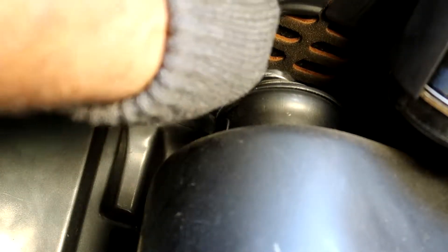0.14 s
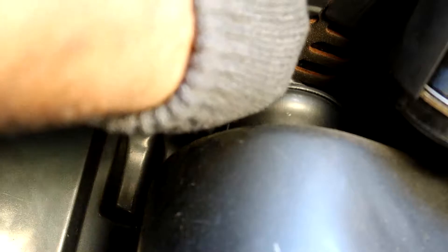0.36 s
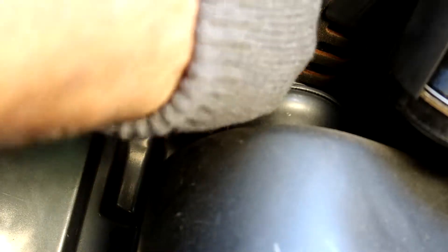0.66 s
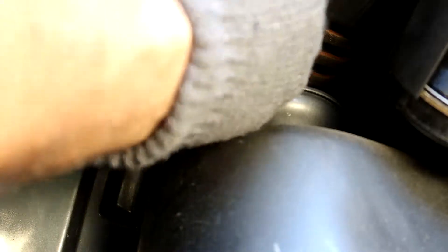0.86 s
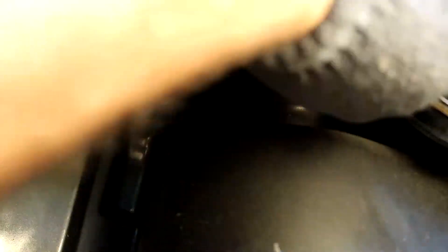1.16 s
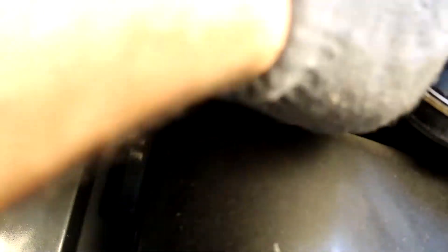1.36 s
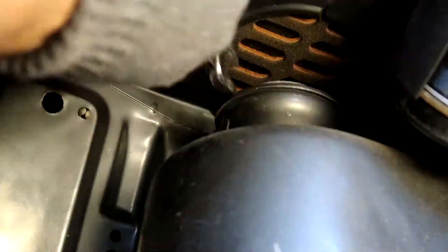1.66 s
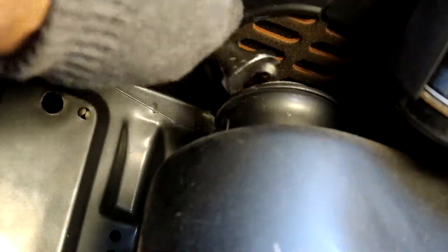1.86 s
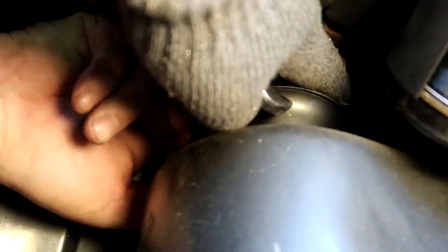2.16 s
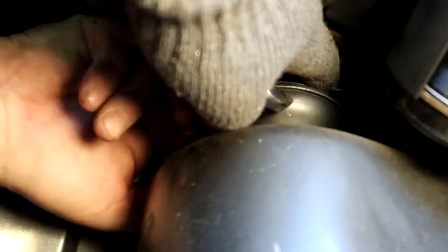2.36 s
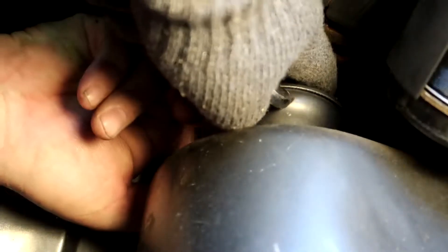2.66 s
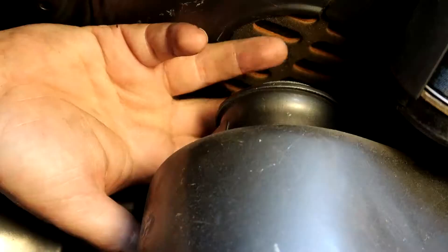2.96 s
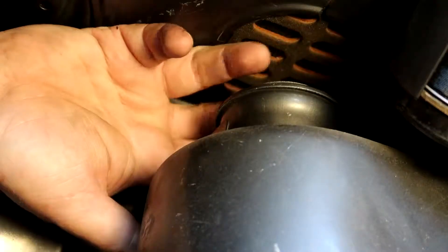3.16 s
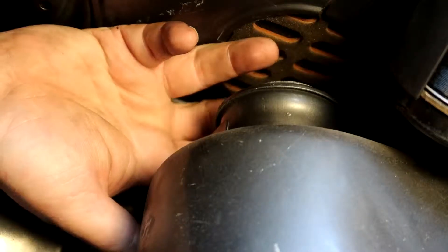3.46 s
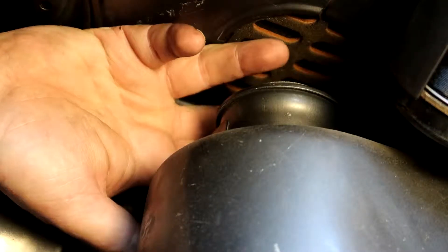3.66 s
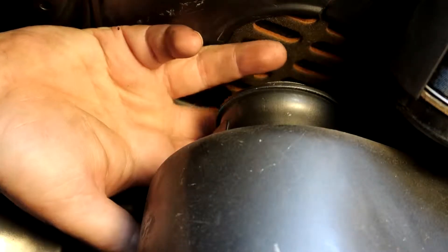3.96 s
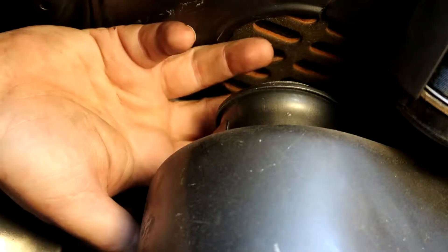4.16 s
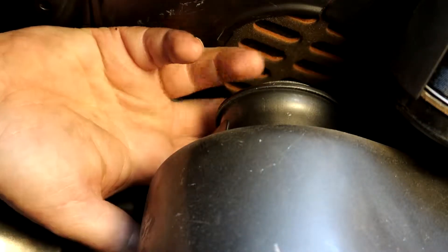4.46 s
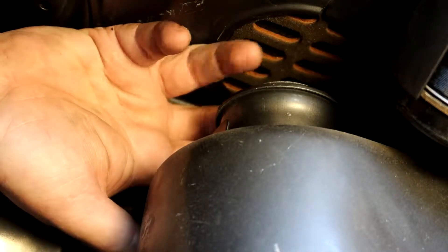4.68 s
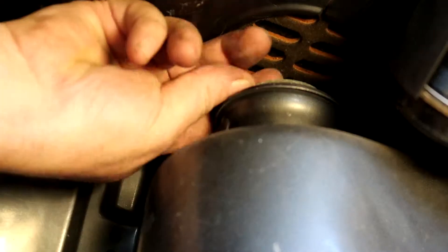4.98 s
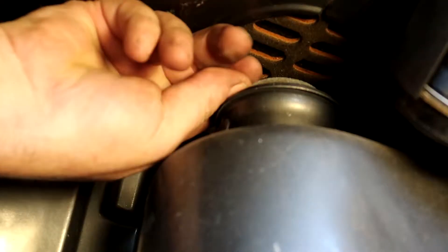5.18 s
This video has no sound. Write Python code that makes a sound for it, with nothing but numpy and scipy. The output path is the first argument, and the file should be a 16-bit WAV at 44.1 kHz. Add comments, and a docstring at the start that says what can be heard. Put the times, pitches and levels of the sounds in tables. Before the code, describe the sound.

A wrench slips and knocks sharply on a steel nut beside a hollow metal housing, then a finger spins the nut with light ticks.

```python
"""Low rumble, faint drones and soft hiss fill a garage; a wrench slips and knocks on a steel nut beside a hollow
metal housing; then a finger spins the nut off its thread, under two wavering hums.
Contacts are bursts of chatter into damped modes; rubbing feeds the same modes with dense slips. Housing knocks and
nut rings are decaying sines, squeaks narrow noise, the background shaped noise. Two close microphone ports hear the
work; the hardest blows clip the recorder and its gain control ducks for a moment."""
import sys
import numpy as np
from scipy import signal
from scipy.fft import rfft, irfft, next_fast_len
from scipy.io import wavfile
from scipy.ndimage import minimum_filter1d

SR = 44100
rng = np.random.default_rng(int(sys.argv[2]) if len(sys.argv) > 2 else 0)


def wrap_up_sound(samples):
    """Save the sound to the file named by the first command line argument, as 16-bit audio."""
    columns = np.atleast_2d(samples).T
    # keep every value between -1 and 1, then stretch to whole-number steps
    tamed = np.clip(columns, -1, 1)
    steps = np.round(tamed * 32767).astype(np.int16)
    wavfile.write(sys.argv[1], SR, steps)


N = 234821

# rumble density: pitch_hz, level_db_per_hz (relative)
RUMBLE_SPECTRUM = [(20, -20), (45, -8), (70, -3.5), (125, -5.5), (190, -11), (270, -23), (345, -16.5),
                   (430, -25.5), (560, -39.5), (700, -54)]
# rumble level over time: time_s, level_db
RUMBLE_LEVEL = [(0, -32.5), (0.7, -30.5), (0.85, -38.5), (1.15, -30.5), (1.35, -31.5), (1.75, -34),
                (2.0, -31.5), (2.6, -31.5), (2.9, -35.5), (4.9, -36), (5.32, -38)]
# hiss density: pitch_hz, level_db_per_hz (relative)
HISS_SPECTRUM = [(500, -6.5), (680, 1), (900, 4.5), (1500, 0.5), (2200, -1), (4000, -6.5), (6500, -13.5),
                 (10400, -8.5), (11500, -10), (15500, -28.5)]
# left-right correlation of the background, limited to -1..1 in use: pitch_hz, likeness
LIKENESS = [(30, 1), (60, 0.998), (150, 1), (380, 0.86), (950, 0.48), (2380, 0.75), (5980, 0.078),
            (15000, -1.14)]
# narrow resonances in the rumble: pitch_hz, width_hz (of each of two passes), level_db (rms)
DRONES = [(180.2, 8.3, -50.5), (225, 8.5, -55), (353.6, 3.6, -56)]
# wrench strokes, steel on steel: strongest_s, level_db, swell_s, fade_s, bright_db (of the part above 1.8 kHz)
WRENCH_STROKES = [(0.01, -42, 0.067, 0.089, 3), (.29, -50, 0.16, 0.044, -7), (.37, -50.5, 0.064, 0.026, -1),
                  (1.11, -45, 0.037, 0.049, -5.5), (1.18, -24.5, 0.022, 0.032, -0.5),
                  (1.23, -50.5, 0.027, 0.079, -5), (1.575, -35, 0.048, 0.059, -10),
                  (1.655, -25, 0.016, 0.045, -24), (1.72, -44, 0.15, 0.057, -3),
                  (1.85, -40.5, 0.055, 0.04, -6), (2.16, -47.5, 0.17, 0.068, -7),
                  (2.2, -44.5, 0.026, 0.032, -10), (2.43, -41, 0.12, 0.1, -5.5),
                  (2.57, -38.5, 0.062, 0.054, -9.5), (2.64, -33, 0.049, 0.069, -10),
                  (2.695, -27.5, 0.026, 0.015, 8.5), (2.745, -40, 0.049, 0.17, -4)]
# finger dragging the nut along its thread: strongest_s, level_db, swell_s, fade_s, bright_db
NUT_STROKES = [(2.87, -37.5, 0.073, 0.18, -7.5), (2.95, -31.5, 0.023, 0.043, -4),
               (3.12, -37, 0.028, 0.16, -11.5), (3.51, -33, 0.078, 0.016, -14),
               (3.57, -35.5, 0.074, 0.045, -12), (3.845, -36.5, 0.03, 0.061, -7.5),
               (3.9, -37, 0.086, 0.076, -13.5), (4.2, -45, 0.087, 0.086, -19),
               (4.26, -44, 0.072, 0.028, -14), (4.58, -46.5, 0.097, 0.064, -17),
               (4.65, -42, 0.028, 0.12, -13), (4.78, -60.5, 0.058, 0.25, 7),
               (4.852, -44, 0.015, 0.017, 1.5), (4.98, -35.5, 0.074, 0.017, -13.5),
               (5.055, -51, 0.069, 0.067, -26), (5.25, -47, 0.37, 0.34, -28)]
# wrench contacts: start_s, peak_db (lowest colour), mid_db and treble_db (relative to peak_db), chatter_ms,
# favoured_low_hz, favoured_high_hz
WRENCH_HITS = [(0.036, -45, 13.5, 13.5, 9.7, 930, 3330), (0.285, -34, -31, -23, 6.7, 900, 3680),
               (0.366, -31, -34, -19, 6.9, 897, 3660), (0.6, -35, -31, -13, 5.4, 1210, 3460),
               (0.649, -38.5, -26, -17, 5, 1010, 3700), (1.174, -29, -7, -0.5, 5, 1200, 4900),
               (1.187, -8, 14, 14, 2.85, 2290, 5140), (1.1915, -20.5, 14, 10, 2.9, 2250, 4210),
               (1.367, -31, -7, -4.5, 11.4, 918, 3200), (1.4925, -19, -3, -8, 11, 900, 3700),
               (1.6275, -6, 9, 1.5, 2.17, 1630, 2720), (1.635, -15, 11, 5, 3.2, 1670, 2500),
               (1.791, -9, -7, -8.5, 10.3, 1520, 4210), (1.942, -17.5, -25, -10, 11, 1287, 5860),
               (2.057, -37.5, -1, -8, 4.7, 1690, 2820), (2.093, -32, -14, -10, 4, 1460, 2720),
               (2.135, -31.5, -16, -10, 18, 1120, 3320), (2.155, -31.5, 7, 4, 3.7, 910, 3260),
               (2.319, -25.5, -2, -1.5, 3.2, 920, 3060), (2.361, -22.5, -7, -11, 3.9, 1160, 2560),
               (2.389, -35.5, -17, 0.5, 9, 980, 3130), (2.443, -38, -12, 6, 1.8, 1210, 3820),
               (2.569, -23.5, -24, -15, 5.3, 1320, 3090), (2.636, -22.5, -8, -10, 5.5, 900, 3950),
               (2.6945, -4.5, 4, 1.5, 3.7, 2040, 3330), (2.6975, 4, 0, 2.5, 1.1, 1790, 5400),
               (2.705, -24.5, 14.5, -6, 7.7, 2200, 2900)]
# nut rocking on its thread: start_s, peak_db, mid_db, treble_db, chatter_ms, favoured_low_hz, favoured_high_hz
NUT_HITS = [(2.864, -24, -9, -7, 14, 1340, 4200), (2.943, -20, -6, -18, 8.4, 1260, 3240),
            (3.003, -29, 3.5, -5, 12.5, 1160, 3010), (3.076, -33.5, -8, -30, 7.2, 1270, 2300),
            (3.106, -25, -14, -7, 11, 900, 3950), (3.166, -23, -14, -3, 9.6, 1230, 3960),
            (3.434, -16.5, -11.5, -2.5, 6.1, 1290, 3810), (3.451, -20.5, -22, -40, 1.7, 915, 3060),
            (3.535, -34.5, -14, -6, 18, 935, 3910), (3.558, -28.5, -26, 0.5, 4.4, 1230, 3940),
            (3.567, -30, -10, -9, 17, 1190, 3920), (3.79, -25, -19, -15, 8.4, 1195, 3820),
            (3.822, -28, -20, -6.5, 4.7, 1480, 3280), (3.88, -23.5, -11, -4.5, 7.4, 920, 4000),
            (3.9, -28, -20, -6, 3.1, 1240, 3940), (3.959, -37, -4, -15, 8.8, 1320, 3010),
            (4.132, -19.5, -17, -6.5, 8.5, 1180, 5350), (4.327, -22, -10, -5.5, 8.2, 1140, 3790),
            (4.576, -36.5, -4, -1, 5.1, 920, 3240), (4.635, -29, -17, -14, 5.2, 1230, 3900),
            (4.724, -26.5, -9, -4, 5.1, 918, 4160), (4.894, -22.5, -13, -9, 9.4, 1260, 3000),
            (4.924, -29.5, -2, -7, 3.7, 960, 3000), (4.956, -22.5, -10, -11, 1.9, 1290, 3940),
            (4.972, -33, -9, -6, 6.9, 1230, 3910), (5.011, -25, -6.5, -18, 3.2, 1700, 2480)]
# modes of the work under the wrench: pitch_hz, width_hz (before contact damping), level_db
WRENCH_MODES = [(919, 55, -4.5), (1025, 100, -5), (1244, 136, 3), (1608, 44, -2.5), (1824, 140, -4.5),
                (2030, 124, 1.5), (2560, 240, 4), (3070, 690, 3), (3330, 410, 9), (3763, 160, 1),
                (4210, 410, 2), (5040, 190, -4.5), (5400, 320, -11.5), (5860, 67, -19.5), (6160, 90, -11.5)]
# modes of the nut on its thread: pitch_hz, width_hz (before contact damping), level_db
NUT_MODES = [(955.6, 5.7, -9), (1227, 51, -1.5), (1490, 143, 1.5), (1785, 46, -7.5), (2430, 84, -17.5),
             (3060, 860, 6), (3300, 520, 2), (3950, 230, -0.5), (4220, 800, -17), (5510, 570, -6.5),
             (13700, 3600, -35)]
# limits of the four colours of a contact, low to air: edge_hz
COLOUR_EDGES_HZ = [760, 1850, 3150, 6400, 18000]
# dull knocks on the hollow housing: start_s, peak_db, region_hz, damping (multiplies decay rate; below 1 rings longer)
KNOCKS = [(0.364, -26, 393, 1.8), (.522, -32, 440, 0.83), (0.657, -27.5, 387, 2.7), (1.1669, -10, 267, 2.1),
          (1.179, -3.5, 200, 0.41), (1.192, -11.5, 400, 1.3), (1.202, -6, 127, 1.8),
          (1.21, -11.5, 129.4, 0.81), (1.498, -17, 225, 0.093), (1.366, -28.5, 356, 0.72),
          (1.6275, -10, 402, 3.3), (1.635, -12.5, 435, 0.9), (1.633, -12, 157, 0.49),
          (1.793, -15.5, 455, 0.57), (2.3613, -11.5, 408, 2.3), (2.461, -14.5, 460, 2.7),
          (2.503, -18.5, 435, 3.1), (2.534, -18, 390, 0.84), (2.559, -14.5, 129, 0.61),
          (2.6971, 3.5, 656, 2.8), (2.702, -9, 78, 0.34), (3.437, -21.5, 300, 0.76), (3.452, -15, 117, 11),
          (3.168, -33, 430, 0.37), (3.88, -34, 406, 1.3), (4.132, -29.5, 417, 1.05),
          (4.896, -35.5, 330, 0.8)]
# housing modes: pitch_hz (before detuning), t60_s (at damping 1)
HOUSING_MODES = [(80, 0.053), (125, 0.14), (150, 0.1), (215, 0.02), (250, 0.021), (345, 0.2), (450, 0.096),
                 (590, 0.11)]
# short rough squeaks: start_s, length_s, pitch_hz, level_db
SQUEAKS = [(1.489, 0.021, 6160, -36.5), (1.577, 0.017, 5040, -45), (1.587, 0.026, 3300, -41),
           (2.434, 0.056, 1180, -37), (2.628, 0.02, 890, -33.5), (2.657, 0.076, 2150, -23.5),
           (4.634, 0.08, 3550, -57), (4.123, 0.025, 13600, -41)]
# loose nut ringing after some touches: start_s, low_mode_db, high_mode_db, damping (multiplies decay rate)
RINGS = [(2.947, -44, -35, 11), (3.007, -52, -29, 26), (3.106, -40, -44, 5.7), (3.577, -42, -58, 1.8),
         (3.961, -44.5, -53, 3.2), (4.134, -64, -51, 1.1), (4.893, -67, -43, 17)]
# lightly damped modes of the loose nut: pitch_hz, t60_s (at damping 1)
FREE_MODES = [(3020, 0.67), (7150, 1.4)]
# humming tones: pitch_hz, start_s, stop_s, start_db, stop_db (rms, before waver)
HUMS = [(105.7, 3.04, 5.0, -33, -41.5), (77.5, 3.76, 4.97, -37, -29.5)]

RUMBLE_FLICKER_DB, HISS_FLICKER_DB, HISS_DB = 3.5, 0.8, -52
STROKE_SWING_DB = 20  # rise over swell_s, fall over fade_s
RATTLE_DB, RATTLE_FADE_S, RATTLE_BRIGHT_DB = -17.5, 0.022, -2  # levels relative to the contact
FAVOUR_DB, FAVOUR_OCTAVES, MODE_CHANCE_DB = 16.5, 0.05, 3  # where a contact lands favours some modes
HARD_DB, AIR_DB_PER_DB = -9.5, 1  # harder contacts gain level in the top colour
SQUEAK_WIDTH_HZ = 90
HUM_EDGE_DB_PER_S = 400
PORT_LAG_S, NEARBY_DB, NEARBY_MS = 3e-5, -21, 4
GARAGE_T60_S, GARAGE_DB, WALL_CUT_HZ = 0.17, -32, 3600
DUCK_FROM_DB, DUCK_DB_PER_DB, DUCK_DEPTH_DB = -4, 3, 6.5
DUCK_ATTACK_S, DUCK_HOLD_S, RECOVER_DB_PER_S = 0.0078, 0.27, 113
CLIP_PEAK, STOPBAND_HZ = 0.86, 16050


def from_db(db):
    """Decibels to gain."""
    return 10 ** (np.asarray(db) / 20)


def rms_one(x):
    """Scale to unit rms."""
    return x / np.sqrt(np.mean(x ** 2) + 1e-20)


def in_time(rows):
    """Interpolate the columns of a curve to every sample."""
    time_s, *columns = np.transpose(rows)
    return [np.interp(np.arange(N) / SR, time_s, column) for column in columns]


def at_hz(points, hz):
    """Read a spectrum on a log-frequency axis."""
    points_hz, values = np.array(points).T
    return np.interp(np.log(hz), np.log(points_hz), values)


def drift(rate_hz):
    """Slow random curve of rms 1: noise through a double one-pole low-pass, made at SR / 40."""
    r = np.exp(-80 * np.pi * rate_hz / SR)
    white = rng.standard_normal(N // 40 + 2002)
    slow = signal.lfilter([1], [1, -2 * r, r * r], white)[2000:]
    return np.interp(np.arange(N) / 40, np.arange(len(slow)), rms_one(slow))


def band(x, low_hz, high_hz):
    """Butterworth band-pass."""
    return signal.sosfilt(signal.butter(2, [low_hz, high_hz], "band", fs=SR, output="sos"), x)


def ring(x, hz, width_hz):
    """Two-pole resonator: a unit click starts a decaying sine of height 1."""
    r = np.exp(-np.pi * max(width_hz, 1) / SR)
    w = 2 * np.pi * hz / SR
    return signal.lfilter([0, np.sin(w)], [1, -2 * r * np.cos(w), r * r], x + 1e-18)


def banded_noise(spectrum, flicker_db, flicker_hz):
    """Rumble or hiss: narrow stereo noise bands, each with its own level, flicker and likeness; rms 1."""
    low_hz, high_hz = spectrum[0][0], min(spectrum[-1][0], .45 * SR)
    edges_hz = np.geomspace(low_hz, high_hz, 22)
    out, together = 0, drift(0.34)
    white = rng.standard_normal((2, 2, N + 8192))  # with a run-in
    for k, (low, high) in enumerate(zip(edges_hz, edges_hz[1:])):
        mid, side = band(white[k % 2], low, high)[:, -N:]
        hz = np.sqrt(low * high)
        alike = np.clip(at_hz(LIKENESS, hz), -1, 1)
        flicker = 0.36 * together + drift(flicker_hz)
        gain = from_db(at_hz(spectrum, hz) + flicker_db * flicker)
        stereo = np.sqrt(1 + alike) * mid + np.sqrt(1 - alike) * side * [[1], [-1]]
        out = out + gain * stereo
    return rms_one(out)


def drones():
    """Noise passed twice through each narrow resonance: faint unsteady tones."""
    out = 0
    for hz, width_hz, level_db in DRONES:
        white = rng.standard_normal(N + SR)
        tone = ring(ring(white, hz, width_hz), hz, width_hz)[SR:]
        out = out + from_db(level_db) * rms_one(tone)
    return out


def rubbing(strokes, modes, slips_per_s, uneven_db, broad_db, housing_db):
    """Dense uneven slips, each caught by one of the modes, for as long as a stroke lasts."""
    chance = slips_per_s * from_db(3 * drift(45)) / SR
    slips = (rng.random(N) < chance) * rng.choice([-1, 1], N)
    slips = slips * from_db(uneven_db * np.minimum(rng.exponential(1, N), 4))
    dealt = rng.integers(0, len(modes), N)
    body = np.zeros(N)
    for k, (hz, width_hz, mode_db) in enumerate(modes):
        body += from_db(mode_db) * ring(slips * (dealt == k), hz, 0.5 * width_hz + 25)
    body = rms_one(body) + from_db(broad_db) * rms_one(band(slips, 1100, 8000))
    low = rms_one(band(band(body, 780, 2000), 700, 2700))
    high = rms_one(band(body, 1800, 22000))
    low = low + from_db(housing_db) * rms_one(band(slips, 260, 520))  # the housing rumbles along
    out = np.zeros(N)
    for strongest_s, stroke_db, swell_s, fade_s, bright_db in strokes:
        swell_s, fade_s = max(swell_s, 1e-3), max(fade_s, 1e-3)
        first = max(0, int((strongest_s - 3 * swell_s) * SR))
        span = slice(first, int((strongest_s + 3 * fade_s) * SR))
        late_s = np.arange(N)[span] / SR - strongest_s
        level_db = stroke_db - STROKE_SWING_DB * np.maximum(-late_s / swell_s, late_s / fade_s)
        out[span] += from_db(level_db) * (low[span] + from_db(bright_db) * high[span])
    return out


def rattles(table):
    """Each contact leaves a short rattle: a weaker, duller stroke with almost no swell."""
    return [(start_s, peak_db + RATTLE_DB, 1e-3, RATTLE_FADE_S, treble_db + RATTLE_BRIGHT_DB)
            for start_s, peak_db, _, treble_db, *_ in table]


def hits(table, modes, crack_db, air_db, damping_hz, rise_ms, first_touch):
    """Each contact is a dying burst of tiny impacts: it rings the modes and leaves a broad crack."""
    out, ms = np.zeros(N + 4096), np.arange(4096) / SR * 1000
    modes_hz = np.array(modes)[:, 0]
    for start_s, peak_db, mid_db, treble_db, chatter_ms, low_hz, high_hz in table:
        shape = (1 - np.exp(-ms / rise_ms)) * np.exp(-ms / np.clip(chatter_ms, .5, 30))
        uneven = from_db(0.8 * rng.standard_normal(128).repeat(32))
        burst = shape * rng.standard_normal(4096) * uneven
        burst[0] = first_touch
        away = np.log2(modes_hz / [[low_hz], [high_hz]]) / FAVOUR_OCTAVES
        favour_db = FAVOUR_DB * np.exp(-away ** 2).sum(axis=0)
        extra_db = rng.normal(0, MODE_CHANCE_DB, len(modes)) + favour_db
        hard_db = AIR_DB_PER_DB * max(0, peak_db - HARD_DB)
        colours_db = [0, mid_db, treble_db, treble_db + air_db + hard_db]
        for low, high, colour_db in zip(COLOUR_EDGES_HZ, COLOUR_EDGES_HZ[1:], colours_db):
            rung = np.zeros(4096)
            for (hz, width_hz, mode_db), mode_extra_db in zip(modes, extra_db):
                if low <= hz < high:
                    rung += from_db(mode_db + mode_extra_db) * ring(burst, hz, width_hz + damping_hz)
            crack = rms_one(band(band(burst, low, high), 1000, 21000))
            part = rms_one(band(rung, 1.2 * low, 1.1 * high)) + from_db(crack_db) * crack
            part = band(part, 0.49 * low, 1.15 * high)  # keep near its own range
            out[round(start_s * SR):][:4096] += from_db(peak_db + colour_db) * part / np.abs(part).max()
    return out[:N]


def struck(start_s, peak_db, modes, gains, damping, contact, size):
    """Decaying sine modes convolved with the contact force, scaled to a peak level."""
    t = np.arange(size) / SR
    sound = np.zeros(size)
    for (hz, t60_s), gain in zip(modes, gains):
        sound += gain * np.sin(2 * np.pi * hz * t) * from_db(-60 * t * damping / t60_s)
    sound = signal.fftconvolve(sound, contact)
    out, at = np.zeros(N + SR), round(start_s * SR)
    out[at:at + len(sound)] = from_db(peak_db) * sound / np.abs(sound).max()
    return out[:N]


def knocks(reach_octaves, soft_cycles, detune, grind_db, grind_ms):
    """A knock and the grinding after it wake housing modes near its region, each a little detuned."""
    out, ms = 0, np.arange(4096) / SR * 1000
    for start_s, peak_db, region_hz, damping in KNOCKS:
        modes = np.array(HOUSING_MODES)
        modes[:, 0] *= 1 + detune * rng.standard_normal(len(modes))
        force = from_db(grind_db) * rng.standard_normal(4096) * np.exp(-ms / grind_ms)
        force[0] = 1
        contact = np.convolve(force, np.hanning(int(soft_cycles / region_hz * SR) + 3))
        gains = np.exp(-(np.log2(modes[:, 0] / region_hz) / reach_octaves) ** 2)
        out = out + struck(start_s, peak_db, modes, gains, damping, contact, size=SR // 4)
    return out


def squeaks(width_hz):
    """Friction noise caught in one narrow resonance, swelling and fading."""
    out = np.zeros(N)
    for start_s, length_s, hz, level_db in SQUEAKS:
        rough = rms_one(ring(rng.standard_normal(8192), hz, width_hz)[2048:])
        swell = np.hanning(int(length_s * SR)) ** .5
        out[round(start_s * SR):][:len(swell)] += from_db(level_db) * swell * rough[:len(swell)]
    return out


def rings(flutter_db):
    """The two lightly damped modes of the loose nut, fluttering as it wobbles."""
    sound = np.zeros(N)
    for start_s, low_db, high_db, damping in RINGS:
        gains = from_db([low_db, high_db])
        sound += struck(start_s, max(low_db, high_db), FREE_MODES, gains, damping, [1.], size=SR // 2)
    return from_db(flutter_db * (drift(20) + drift(45))) * sound


def hum(hz, start_s, stop_s, start_db, stop_db, waver_db):
    """A low sine that wavers in level and a little in pitch, with steep fades outside its span."""
    t = np.arange(N) / SR
    outside_s = np.maximum(0, np.maximum(start_s - t, t - stop_s))
    level_db = np.interp(t, [start_s, stop_s], [start_db, stop_db]) - HUM_EDGE_DB_PER_S * outside_s
    phase = 2 * np.pi * np.cumsum(hz + 0.656 * drift(2.02)) / SR
    return np.sqrt(2) * from_db(level_db + waver_db * drift(23.0)) * np.sin(phase)


def two_ports(x):
    """The left port hears the work a little later; nearby metal scatters it with opposite sign to each."""
    size = next_fast_len(N)
    turn = np.pi * np.arange(size // 2 + 1) * SR / size * PORT_LAG_S  # half the lag to each side
    direct = irfft(rfft(x, size) * np.exp(1j * np.outer([-1, 1], turn)), size)[:, :N]
    decay = np.exp(-np.arange(512) / SR * 1000 / NEARBY_MS)
    scatter = band(rng.standard_normal(512) * decay, 1200, 5000)
    scattered = np.convolve(x, scatter / np.linalg.norm(scatter))[:N]
    return direct + from_db(NEARBY_DB) * scattered * [[1], [-1]]


def garage(x):
    """Reverberation coloured by sheet metal around: a band-passed noise tail for each side."""
    t = np.arange(int(.4 * SR)) / SR
    tail = rng.standard_normal((2, len(t))) * from_db(-60 * t / GARAGE_T60_S) * (t > .004)
    tail = band(tail, 2000, WALL_CUT_HZ)
    tail = tail / np.sqrt(np.sum(tail ** 2) / 2)
    return signal.fftconvolve(x[None], tail, axes=1)[:, :N]


def gain_control(x):
    """Loud peaks turn the gain down; it holds for a while, then comes back."""
    peak_db = 20 * np.log10(np.abs(x).max(axis=0) + 1e-9)
    cut_db = np.clip(DUCK_DB_PER_DB * (peak_db - DUCK_FROM_DB), 0, DUCK_DEPTH_DB)
    size = int(DUCK_HOLD_S * SR)
    # largest cut over the past hold time
    held_db = -minimum_filter1d(-cut_db, size, origin=(size - 1) // 2, mode="constant")
    ramp_db = RECOVER_DB_PER_S * np.arange(N) / SR
    released_db = np.maximum.accumulate(held_db + ramp_db) - ramp_db
    r = np.exp(-1 / (DUCK_ATTACK_S * SR))
    return x * from_db(-signal.lfilter([1 - r], [1, -r], released_db))


def scene():
    """Background, work on the nut and its reflections."""
    rumble_db, = in_time(RUMBLE_LEVEL)
    rumble = from_db(rumble_db) * banded_noise(RUMBLE_SPECTRUM, RUMBLE_FLICKER_DB, flicker_hz=11.7)
    hiss = from_db(HISS_DB) * banded_noise(HISS_SPECTRUM, HISS_FLICKER_DB, flicker_hz=7.6)
    wrench_rub = rubbing(WRENCH_STROKES + rattles(WRENCH_HITS), WRENCH_MODES,
                         slips_per_s=3600, uneven_db=3.0, broad_db=-8, housing_db=-0.5)
    wrench_hits = hits(WRENCH_HITS, WRENCH_MODES, crack_db=-4.0, air_db=-12.5,
                       damping_hz=24.0, rise_ms=0.71, first_touch=4.5)
    housing = knocks(reach_octaves=0.47, soft_cycles=0.1, detune=0.03, grind_db=-36.5, grind_ms=16)
    squeaking = squeaks(SQUEAK_WIDTH_HZ)
    nut_rub = rubbing(NUT_STROKES + rattles(NUT_HITS), NUT_MODES,
                      slips_per_s=3200, uneven_db=2.0, broad_db=-11.5, housing_db=-12)
    nut_hits = hits(NUT_HITS, NUT_MODES, crack_db=-25, air_db=-4.5,
                    damping_hz=34.0, rise_ms=0.13, first_touch=5.3)
    ringing = rings(flutter_db=3.5)
    work = wrench_rub + wrench_hits + housing + squeaking + nut_rub + nut_hits + ringing
    hums = sum(hum(*row, waver_db=3.5) for row in HUMS)
    return two_ports(work) + from_db(GARAGE_DB) * garage(work) + rumble + drones() + hiss + hums


def record(dry):
    """Gain control follows the hardest blows, which clip all the same; a steep low-pass cuts the top."""
    clipped = np.clip(gain_control(dry), -CLIP_PEAK, CLIP_PEAK)
    low_pass = signal.cheby2(16, 50, STOPBAND_HZ, fs=SR, output="sos")
    return signal.sosfilt(low_pass, clipped)


dry = scene()
out = record(dry)
wrap_up_sound(out)
```